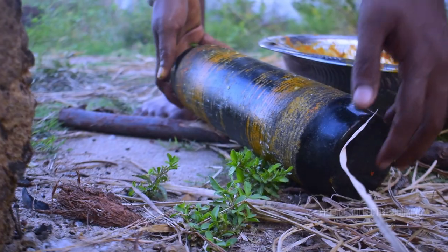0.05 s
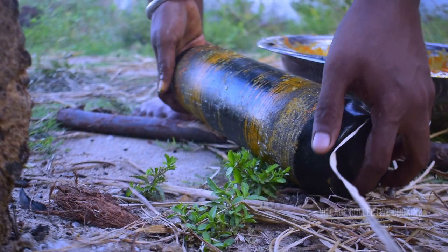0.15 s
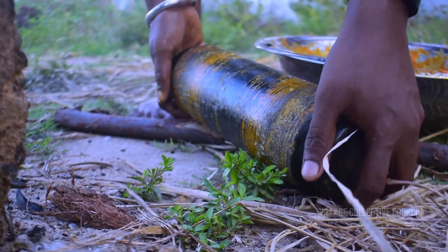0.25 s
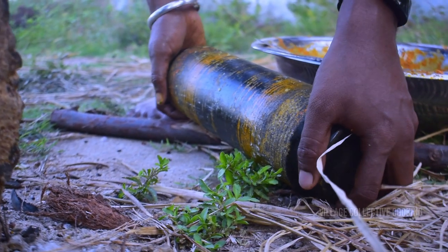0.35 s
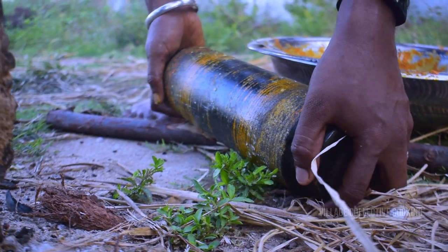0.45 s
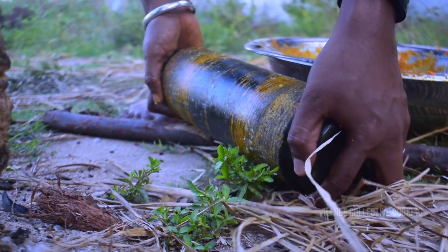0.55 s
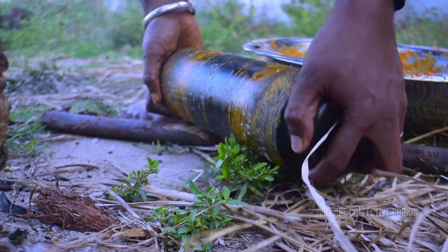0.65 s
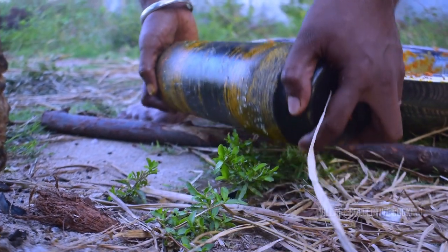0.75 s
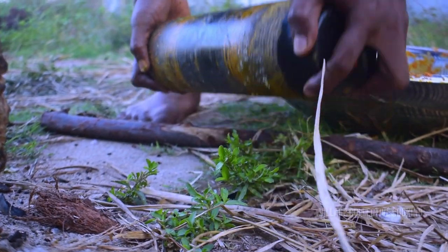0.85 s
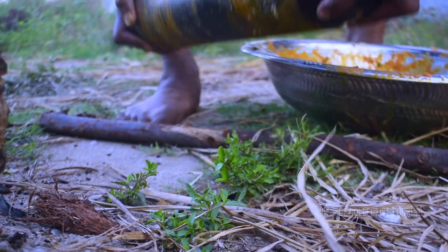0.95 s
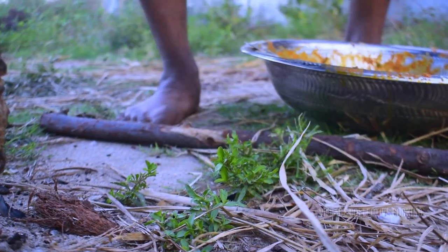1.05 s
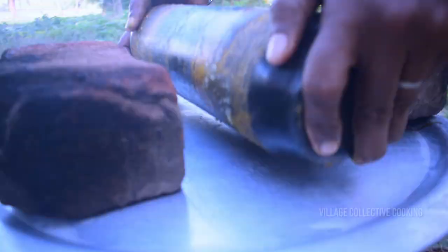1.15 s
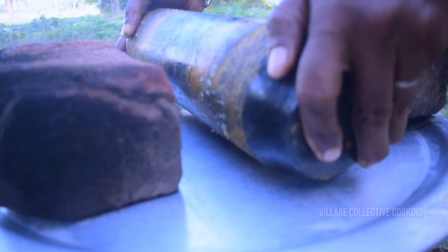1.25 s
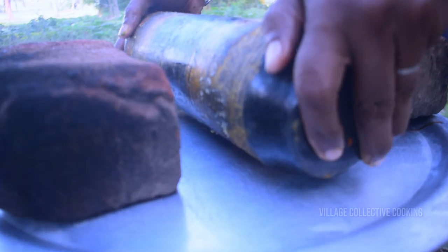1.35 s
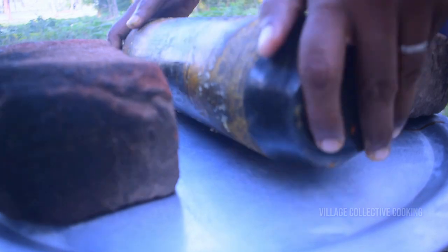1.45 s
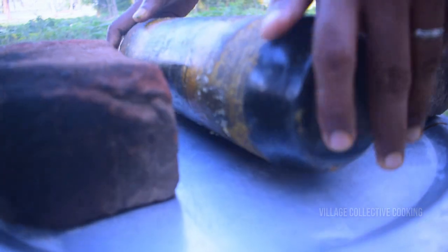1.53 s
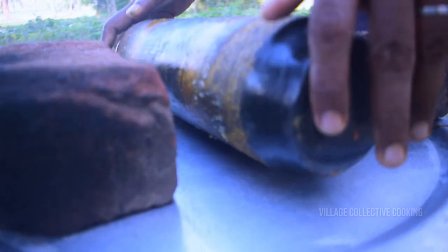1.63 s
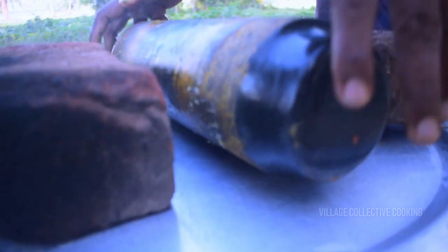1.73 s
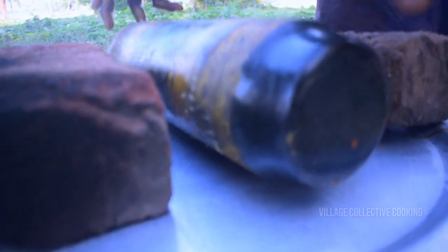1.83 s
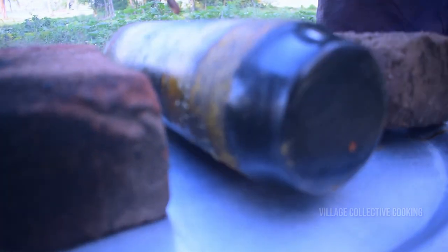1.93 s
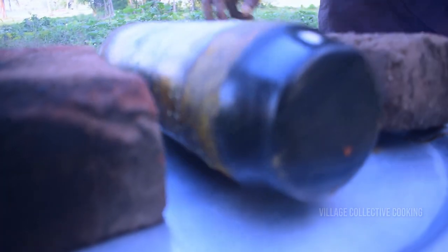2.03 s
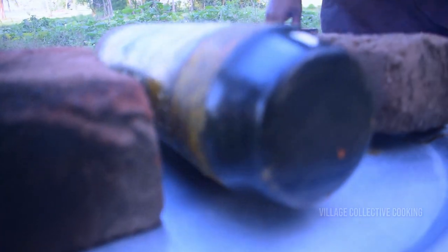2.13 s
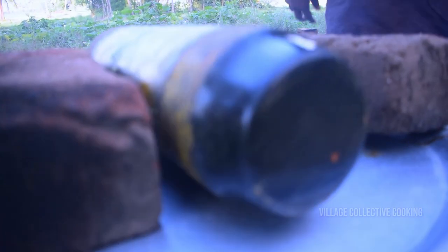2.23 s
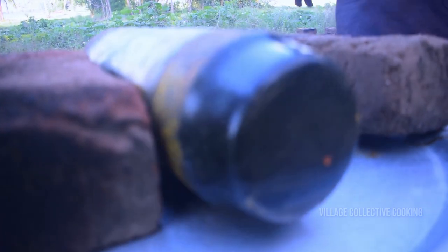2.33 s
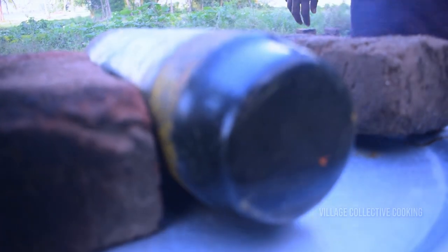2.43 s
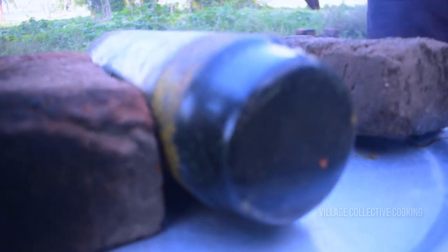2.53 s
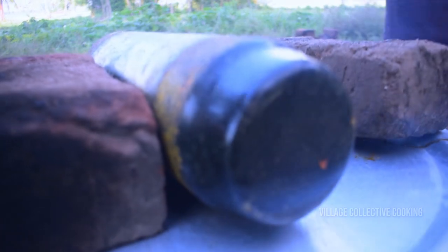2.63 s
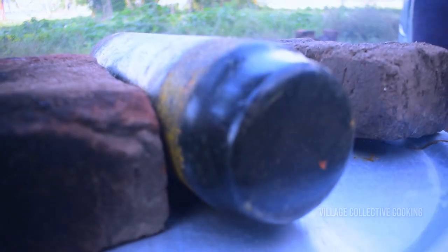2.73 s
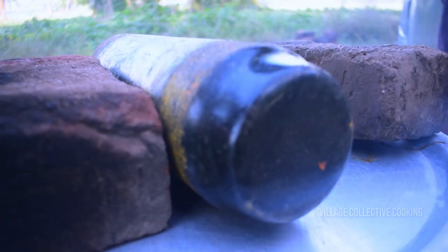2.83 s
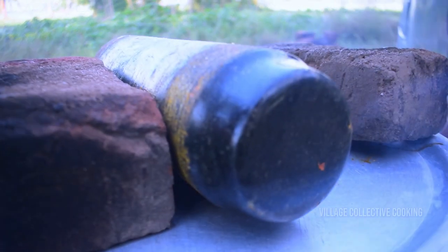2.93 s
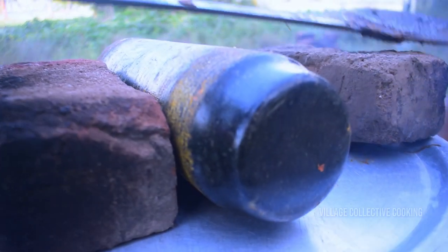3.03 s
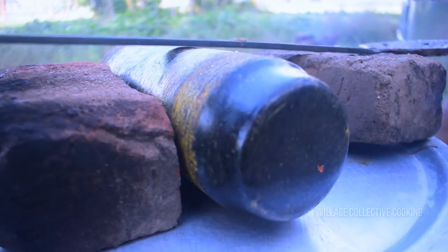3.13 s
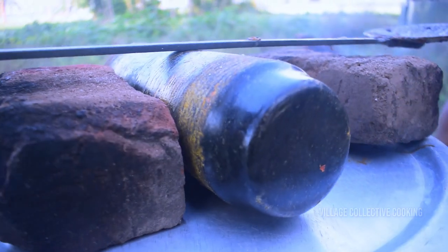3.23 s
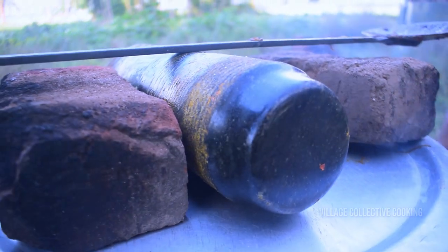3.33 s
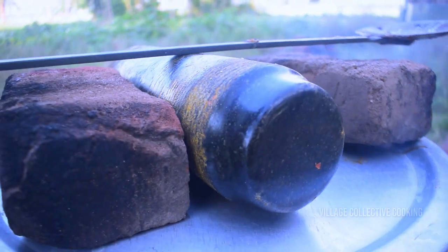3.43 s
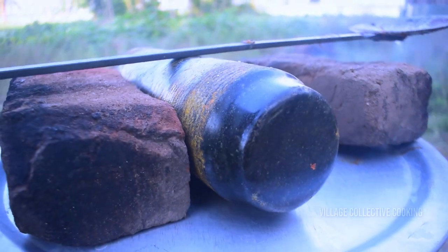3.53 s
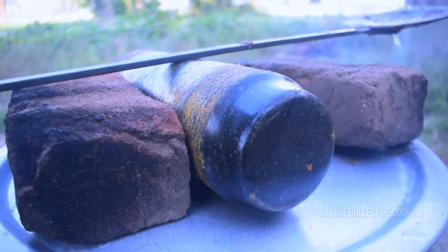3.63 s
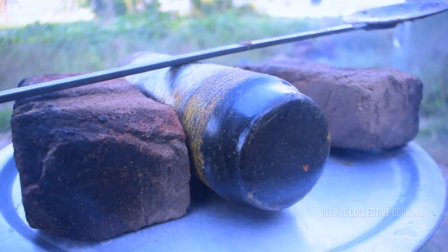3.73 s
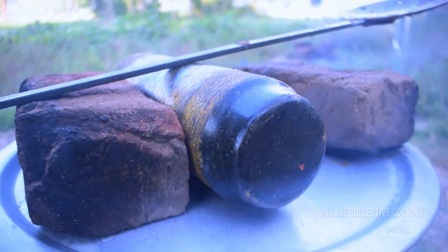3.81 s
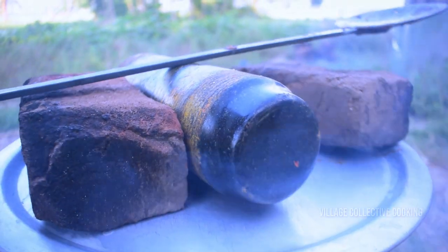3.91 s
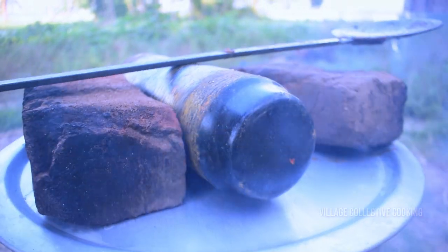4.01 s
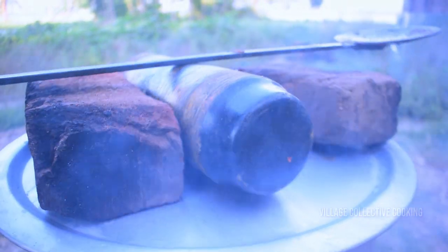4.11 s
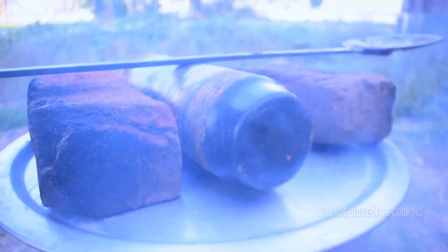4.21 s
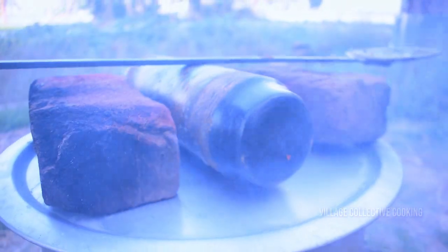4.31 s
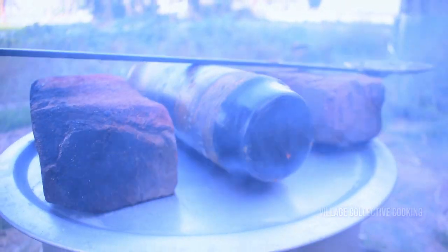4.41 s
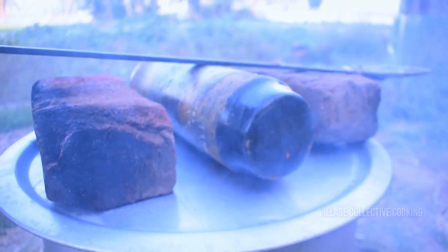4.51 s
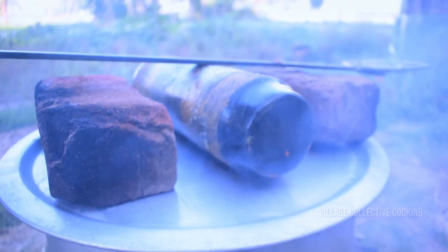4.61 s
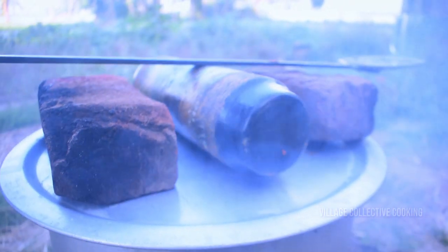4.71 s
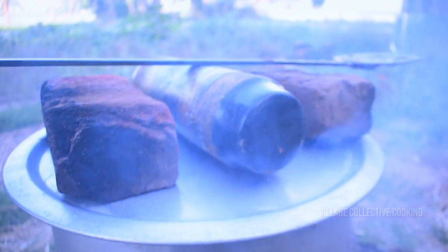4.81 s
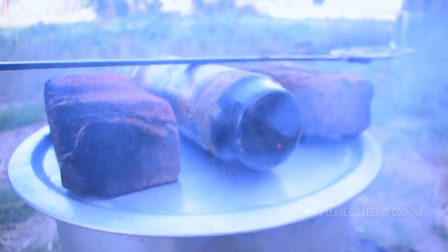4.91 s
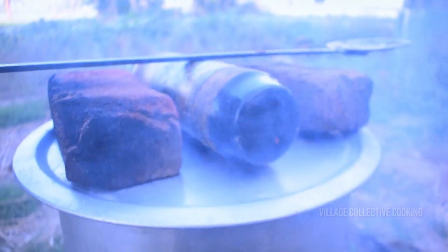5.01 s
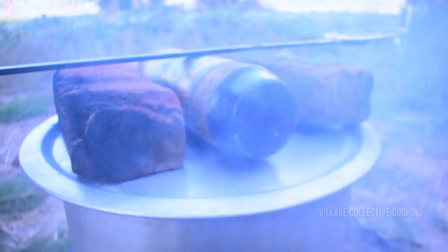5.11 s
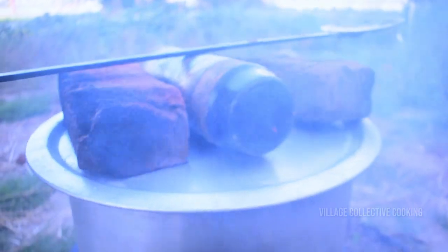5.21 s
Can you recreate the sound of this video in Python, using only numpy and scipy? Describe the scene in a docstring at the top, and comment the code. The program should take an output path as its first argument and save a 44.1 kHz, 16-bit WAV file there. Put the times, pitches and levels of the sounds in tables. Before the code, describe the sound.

Soft open-air hush with crisp rustling, then a short bird chirp just before a heavy clank on a metal pot lid. More knocks tumble and rock, fading to small ticks. Around the middle another cluster of hard blows includes a bright glass clink. A thin scrape and low lid hum follow, then a dull bump, fine rustles and distant chirps, all closely miked.

```python
"""Outdoors, over soft shaped-noise air, hands lift a heavy bottle out of dry straw: crackling grains, crushed grit.
A near bird calls in gliding partials; then bottle and bricks land and rock on a loaded metal lid, noise-driven modes.
More blows follow, with taps that ring the glass modes; a thin rod scrapes by stick-slip noise and the lid hums.
A faint far bird call sounds near the end, looped about every .2 s.
The loudest blows overload the microphone, a lopsided soft limit."""
import sys
import numpy as np
from scipy import signal
from scipy.fft import rfft, irfft
from scipy.io import wavfile
from scipy.ndimage import uniform_filter1d

SR = 44100
rng = np.random.default_rng(int(sys.argv[2]) if len(sys.argv) > 2 else 0)


def master(y):
    """Save y as 16-bit WAV."""
    cut = np.clip(np.atleast_2d(y).T, -1, 1)
    pcm = np.round(cut * 32767)  # scale
    wavfile.write(sys.argv[1], SR, pcm.astype(np.int16))


N = 231604


def undb(db):
    """Level to amplitude: 20 dB for each factor of ten."""
    return 10 ** (np.asarray(db) / 20)


def unit(x):
    """Normalisation to a root-mean-square value of one."""
    return x / np.sqrt(np.mean(x ** 2))


def track(rows):
    """Linear interpolation of a timed curve."""
    return np.interp(np.arange(N) / SR, *np.transpose(rows))


def colour(x, shape):
    """Minimum-phase filtering by the folded cepstrum: a causal (f/Hz, level/dB) shape, unit gain on noise."""
    hz, db = np.transpose(shape)
    bins_hz = np.arange(2049) * SR / 4096
    log_gain = np.interp(np.log(bins_hz + 1), np.log(hz), db) * np.log(10) / 20
    cepstrum = irfft(log_gain)
    cepstrum[1:2048] *= 2
    cepstrum[2049:] = 0
    impulse = irfft(np.exp(rfft(cepstrum)))[:2048]
    return signal.fftconvolve(x, impulse / np.linalg.norm(impulse))[:N]


def ring(x, modes):
    """Modal superposition: the drive excites a sum of decaying sines, unit gain on noise."""
    t = np.arange(SR // 2) / SR
    impulse = np.zeros(len(t))
    for hz, db, t60 in modes:
        decay = undb(db - 60 * t / np.clip(t60, .01, .6))
        impulse += rng.choice([-1, 1]) * decay * np.sin(2 * np.pi * hz * t)
    return signal.fftconvolve(x, impulse / np.linalg.norm(impulse))[:N]


def bursts(s, db, t60, rise, hz=None):
    """Exponential decay after a short rise: envelopes of contacts, or sines when frequencies are given."""
    out = np.zeros(N + SR)
    for k, at in enumerate((np.asarray(s) * SR).astype(int)):
        last = np.clip(t60[k], .004, .7)
        t = np.arange(int(1.4 * last * SR)) / SR
        shape = undb(db[k] - 60 * t / last) * np.minimum(t / rise, 1)
        if hz is not None:
            shape = shape * np.sin(2 * np.pi * hz[k] * t)
        out[at:at + len(t)] += shape
    return out[:N]


# how fast each kind of gesture dies once its hold ends [dB/s]
FADE_DB_S = dict(drag=900, rustle=420, rock=100, note=3500)


def swells(s, rise, hold, db, fade_db_s):
    """Power addition of gestures, each rising from 20 dB down, holding and fading linearly in dB."""
    t = np.arange(0, N, 32) / SR
    u = t - np.asarray(s)[:, None]
    rise, hold, db = (np.asarray(v)[:, None] for v in (rise, hold, db))
    climb = 20 * np.maximum(1 - u / np.maximum(rise, 1e-4), 0)
    fade = fade_db_s * np.maximum(u - rise - hold, 0)
    power = np.sum(undb(2 * (db - climb - fade)) * (u > 0), axis=0)
    return np.interp(np.arange(N) / SR, t, np.sqrt(power))


def walk(rate):
    """Slewed random modulation: normal values held 1 / rate s, then smoothed; spread near 1."""
    k = int(SR / rate)
    return uniform_filter1d(np.repeat(rng.standard_normal(N // k + 1), k), k)[:N]


def grains(rate, spread_db, hiss):
    """Shot noise: sparse clicks of very uneven size, mean count rate per second, over an even hiss."""
    size = undb(spread_db * np.minimum(rng.exponential(size=N), 3))
    clicks = (rng.random(N) < rate / SR) * rng.standard_normal(N) * size
    return unit(unit(clicks) + hiss * rng.standard_normal(N))


# spectrum of the open air: f/Hz, relative level/dB
AIR_SPECTRUM = [(15, -65), (25, -31.5), (146, -0.5), (288, 2), (378, 2), (470, -3), (1730, -10.5),
                (2270, -14.5), (5420, -16), (8600, -17.5), (10700, -19.5), (15200, -28.5), (16500, -53)]
# low band of the air before its random swell, louder until about 1.2 s: t/s, level/dB
AIR_LEVEL = [(0., -57.5), (1.19, -54.5), (1.21, -64.5), (3.2, -65), (4.3, -63), (5.25, -65)]


def air():
    """Stationary noise with slow amplitude modulation: a soft outdoor hush whose bass swells slowly."""
    white = rng.standard_normal((2, N))
    low_shape = [row for row in AIR_SPECTRUM if row[0] < 2500] + [(3000, -79)]
    high_shape = [(1000, -38)] + [row for row in AIR_SPECTRUM if row[0] > 1500]
    low = undb(track(AIR_LEVEL) + 2.0 * walk(5.4)) * colour(white[0], low_shape)
    high = undb(-66.5 + 3.3 * walk(16)) * colour(white[1], high_shape)
    return low + high


# rustling of straw, hands and grit, with a faint steady hiss beneath from 1.21 s:
# start t/s, rise/s, hold/s, middle band level/dB, thin top band level/dB
RUSTLES = [(.0, .025, 1.11, -56, -57), (.19, .06, .02, -50, -44), (.4, .05, .24, -48, -44),
           (.47, .06, .04, -45, -47), (1.21, .02, 4.1, -68, -78), (1.44, .03, .15, -58, -72),
           (1.66, .05, .03, -59, -60), (1.8, .1, .1, -55, -52), (2.04, .08, .03, -60, -69),
           (2.17, .05, .2, -63, -62), (2.55, .15, .04, -59, -59), (2.85, .15, .05, -60, -57),
           (3.18, .03, .08, -58, -64), (3.38, .08, .1, -61, -57), (3.84, .07, .06, -63, -61),
           (4.0, .03, .1, -65, -72), (4.11, .06, .08, -57, -60), (4.27, .01, .13, -56, -52),
           (4.45, .01, .07, -52, -60), (4.65, .01, .2, -66, -70), (4.87, .03, .27, -60, -60),
           (5.17, .02, .1, -63, -80)]


def rustle():
    """Frictional shot noise: stalks and fingers crackle in a middle and a thin top band, over a faint hiss."""
    s, rise, hold, mid_db, top_db = np.transpose(RUSTLES)

    def move(db):
        """Amplitude modulation: swells with random unevenness."""
        return swells(s, rise, hold, db, FADE_DB_S["rustle"]) * undb(1.8 * walk(40))

    mid_shape = [(500, -33), (1500, -16), (3500, 2), (5500, 5.0), (7500, -1.5), (10000, -47)]
    top_shape = [(6000, -4), (8500, -7), (10500, -1.), (13000, -3.0), (16000, -12)]
    mid = colour(grains(700, 2.6, 1.9), mid_shape)
    top = colour(grains(700, 4.6, 1.6), top_shape)
    return move(mid_db) * mid + move(top_db) * top


# grit crushed at a contact: t/s, relative level/dB, brightness/dB
CRACK_EVENTS = [(.175, -42, -3), (.245, -42, 5), (.3784, -49, 9), (.427, -43, 8), (.4683, -39, 3),
                (.4857, -46, 6), (1.2195, -15, -3), (1.2356, -31, -12), (1.2728, -35, -11),
                (1.4175, -14, 0), (1.4298, -18, -4), (1.44, -16, -1), (1.4554, -31, 4), (1.4674, -36, 7),
                (1.51, -43, 2), (1.5694, -46, -12), (1.6232, -46, -11), (1.6818, -43, -10),
                (1.7447, -49, 0), (1.8108, -50, 4), (1.8494, -41, 4), (1.8635, -42, 3), (1.8811, -47, 2),
                (1.8984, -35, 3), (1.9059, -26, 1), (1.952, -41, 4), (1.9764, -44, 8), (1.9925, -38, 8),
                (2.0006, -35, 7), (2.0777, -55, 7), (2.1311, -51, 2), (2.198, -50, 4), (2.2404, -46, 2),
                (2.2605, -43, 5), (2.29, -46, 6), (2.31, -38, 3), (2.342, -31, -1), (2.3907, -40, 5),
                (2.537, -54, -9), (2.7142, -47, -2), (2.8173, -53, -9), (2.9944, -47, -1),
                (3.0215, -48, -4), (3.0741, -16, -2), (3.0855, -18, -9), (3.1094, -41, -9),
                (3.1234, -23, -7), (3.1587, -21, -5), (3.253, -48, -3), (3.3654, -52, -3), (3.4798, -46, 0),
                (3.5124, -48, -2), (4.18, -50, 8), (4.2845, -38, 6), (4.2942, -40, 2), (4.316, -45, 4),
                (4.3344, -46, 4), (4.3455, -45, 0), (4.3683, -45, 3), (4.41, -44, 1), (4.4613, -30, -2),
                (4.5605, -45, 3), (4.6069, -44, 2), (4.6573, -36, 7), (4.93, -51, 6), (4.9592, -48, 2),
                (5.01, -50, 6), (5.036, -52, 6), (5.0643, -48, 2), (5.1161, -35, 4), (5.1593, -38, 6)]
# broad spectrum of crushed grit: f/Hz, relative level/dB
GRIT_SPECTRUM = [(2500, -29.5), (3500, -1), (4200, -0.5), (5800, 4.5), (7000, -4), (8500, -5.5),
                 (11000, -28.5)]
# hard edges that chime: f/Hz, relative level/dB, t60/s
SHARD_MODES = [(3840, -3, 0.047), (4200, -0.5, 0.023), (4770, -3.5, 0.021), (5190, 1, 0.026),
               (5410, -9, .03), (5580, 1, 0.022), (6410, -1, 0.018), (7360, -10, 0.017)]
CRACK_T60_S, CRACK_T60_S_PER_DB = .062, .0006  # at -20 dB; harder contacts spit longer


def contacts():
    """Brittle fracture: noise spits unevenly as it dies; bright contacts trade lows for top, hard edges chime."""
    s, db, bright_db = np.transpose(CRACK_EVENTS)
    t60 = CRACK_T60_S + CRACK_T60_S_PER_DB * (db + 20)
    spit = grains(4000, 2.2, 1.2) * undb(2.2 * walk(250))
    crush = bursts(s, db, t60, rise=0.0007) * spit
    low_push = bursts(s, db - bright_db, 1.16 * t60, rise=.0006) * spit
    top_push = bursts(s, db + bright_db, 0.71 * t60, rise=0.0011) * spit
    low = colour(low_push, [(700, -23), (1500, 1.5), (3000, 1.5), (4500, -30.5)])
    top = colour(top_push, [(5000, -28), (8000, 5.0), (12000, -1.5), (16000, -12)])
    middle = colour(crush, GRIT_SPECTRUM)
    chime = ring(crush, SHARD_MODES)
    return middle + undb(-5.0) * chime + undb(-7.5) * low + undb(-2.5) * top


# throat resonance: f/Hz, gain/dB
THROAT_GAIN = [(1000, -22), (2200, -18), (3300, -4), (4150, -8), (4420, 1), (5000, -6), (5450, 0),
               (6500, -24), (8000, -28), (10500, -42), (13000, -72), (17000, -110)]


def song(notes, dull_db_khz):
    """Source-filter voice: each slightly hoarse note bends along an arc, the throat weighs five partials."""
    out = np.zeros(N)
    throat_hz, throat_db = np.transpose(THROAT_GAIN)
    wobble = 1 + .012 * walk(500)
    flutter = [walk(200) for _ in range(5)]
    for s, length, hz0, hz1, hz2, db, lift_db in notes:
        at = np.arange(int((s - .003) * SR), int((s + length + .02) * SR))
        u = np.clip((at / SR - s) / length, -.1, 1.1)
        bend = (hz1 - (hz0 + hz2) / 2) * 4 * u * (1 - u)
        hz = hz0 + (hz2 - hz0) * u + bend
        phase = 2 * np.pi * np.cumsum(hz * wobble[at]) / SR
        edge = np.sqrt(2) * swells([s - .002], [.004], [length - .004], [db], FADE_DB_S["note"])[at]
        for k in range(1, 6):
            throat = np.interp(np.log(k * hz), np.log(throat_hz), throat_db)
            tilt = lift_db * (k - 1) + dull_db_khz * k * hz / 1000
            out[at] += edge * undb(throat + tilt + k * flutter[k - 1][at]) * np.sin(k * phase)
    return out


# near call: start t/s, length/s, start f/Hz, middle f/Hz, end f/Hz, level before the throat/dB,
# lift of each overtone/dB
NEAR_NOTES = [(.841, .021, 1050, 1760, 2430, -26, 0), (.864, .033, 3090, 3330, 2980, -26, 13),
              (.901, .063, 2280, 1990, 1650, -21, 0)]
# far call, same columns: start t/s, length/s, start, middle and end f/Hz, level/dB, overtone lift/dB
FAR_NOTES = [(4.876, .027, 3400, 3180, 2760, -38, 0), (4.907, .04, 2060, 1900, 1700, -35, 3)]
# looped copies of the far call: shift t/s, relative level/dB
FAR_LOOP = [(-.396, -3.5), (-.203, -1), (0., 0), (.197, 0), (.287, -13.5)]
FAR_DULL_DB_KHZ = -4.5  # treble tilt of the far call


def birds():
    """Diffuse reflection: near call with hoarse start and looped far call, blurred by echo off moving leaves."""
    hoarse = bursts([.832, .845], [-33., -32.], [.12, .06], rise=0.0025) * rng.standard_normal(N)
    hoarse_shape = [(900, -30), (2000, -12.5), (5500, -11.0), (7000, -11.5), (10000, -19.5), (12000, -40)]
    calls = song(NEAR_NOTES, 0) + colour(hoarse, hoarse_shape)
    far = song(FAR_NOTES, FAR_DULL_DB_KHZ)
    for shift, db in FAR_LOOP:
        calls = calls + undb(db) * np.roll(far, int(shift * SR))
    t = np.arange(SR // 2) / SR
    trees = rng.standard_normal(len(t)) * undb(-60 * t / 0.55) * np.minimum(t / .006, 1)
    moving = calls * (.5 + walk(700))
    echo = signal.fftconvolve(moving, trees / np.linalg.norm(trees))[:N]
    return calls + undb(-14.0) * echo


def lid(push, modes, broad):
    """Damped plate vibration: the weighed-down sheet gives short modes over a broad band."""
    return undb(-2.5) * ring(push, modes) + undb(-6.0) * colour(push, broad)


# where a load lands decides which lid mode sings: f/Hz, level over the boom/dB
CENTRE, HALF, NEAR_RIM, RIM = (255, 1.5), (415, 0), (640, -8), (1010, -0.5)
# blows on the lid: t/s, relative boom level/dB, relative knock level/dB, place (f/Hz, level over the boom/dB)
LID_BLOWS = [(1.221, -13, -10, CENTRE), (1.238, -14, -15, RIM), (1.271, -19, -26, NEAR_RIM),
             (1.284, -22, -33, HALF), (1.325, -23, -35, HALF), (1.39, -33, -50, CENTRE),
             (1.417, -29, -12, RIM), (1.43, -18, -19, RIM), (1.445, -26, -21, HALF),
             (1.466, -28, -39, CENTRE), (1.489, -28, -35, CENTRE), (1.51, -33, -40, CENTRE),
             (1.567, -24, -25, HALF), (1.589, -28, -44, NEAR_RIM), (1.623, -27, -28, HALF),
             (1.644, -30, -43, NEAR_RIM), (1.68, -25, -26, HALF), (1.708, -30, -52, CENTRE),
             (1.743, -28, -36, HALF), (1.789, -42, -54, HALF), (1.844, -50, -42, HALF),
             (1.901, -43, -34, RIM), (1.994, -54, -47, RIM), (2.289, -58, -46, RIM),
             (2.341, -29, -34, CENTRE), (2.391, -45, -46, RIM), (2.531, -52, -49, RIM),
             (2.732, -56, -51, HALF), (2.812, -53, -49, RIM), (3.012, -59, -51, HALF),
             (3.074, -15, -18, CENTRE), (3.087, -19, -15, NEAR_RIM), (3.104, -24, -24, HALF),
             (3.123, -19, -17, NEAR_RIM), (3.139, -23, -35, HALF), (3.158, -30, -27, NEAR_RIM),
             (3.194, -26, -30, CENTRE), (3.254, -36, -40, NEAR_RIM), (3.288, -42, -55, CENTRE),
             (3.364, -41, -50, CENTRE), (3.423, -40, -50, NEAR_RIM), (3.48, -32, -48, CENTRE),
             (3.511, -38, -53, CENTRE), (4.295, -60, -49, HALF), (4.368, -56, -45, HALF),
             (4.407, -53, -50, HALF), (4.46, -28, -35, CENTRE), (4.476, -25, -37, NEAR_RIM),
             (4.504, -28, -38, NEAR_RIM), (4.523, -27, -43, CENTRE), (4.56, -38, -44, CENTRE),
             (4.607, -52, -55, HALF), (4.657, -50, -48, CENTRE), (4.759, -58, -72, CENTRE),
             (5.117, -56, -47, RIM), (5.159, -66, -51, RIM)]
# loads rocking on the lid: start t/s, rise/s, hold/s, relative level/dB
ROCKING = [(1.3, .07, .22, -43), (3.22, .08, .09, -47), (3.85, .15, .1, -68), (4.5, .05, .22, -61)]
# deep modes of lid and pot air: f/Hz, relative level/dB, t60/s
BOOM_MODES = [(122, -14, 0.11), (161.4, -10.5, 0.14), (201.4, -4, 0.15), (255.6, -2, 0.14),
              (307.7, -1, 0.1), (353, -1, .11), (415.5, -1, .11), (470.4, -2.5, 0.075), (521.5, -3.5, .1),
              (575, -7.5, .08)]
# hard modes of the sheet: f/Hz, relative level/dB, t60/s
KNOCK_MODES = [(636, -6.5, 0.067), (742, 0, 0.069), (828, -2, 0.074), (892, -4, 0.083), (998, -1, .07),
               (1066, -3, .08), (1160, -4.5, 0.078), (1318, -3, 0.042), (1392, -9.5, .05), (1517, -4, .045),
               (1664, -10.5, 0.025), (1876, -11.5, .035), (2155, -15, .035)]
BOOM_T60_S, SING_T60_S = .08, .115
KNOCK_T60_S, KNOCK_T60_S_PER_DB = .082, .0015  # at -20 dB; harder blows push longer


def thuds():
    """Modal excitation by impact: blows push deep and hard lid modes; where the load sits picks one ring."""
    s, boom_db, knock_db, hz, sing_db = np.transpose([row[:-1] + row[-1] for row in LID_BLOWS])
    knock_t60 = KNOCK_T60_S + KNOCK_T60_S_PER_DB * (knock_db + 20)
    rock = swells(*np.transpose(ROCKING), FADE_DB_S["rock"]) * undb(2.1 * walk(30))
    boom = bursts(s, boom_db, np.full(len(s), BOOM_T60_S), rise=0.0032) + rock
    knock = bursts(s, knock_db, knock_t60, rise=0.0014) + undb(-18.0) * rock
    rings = bursts(s, boom_db + sing_db, np.full(len(s), SING_T60_S), rise=0.0014, hz=hz)
    deep_shape = [(25, -70), (60, -40), (100, -13), (170, 1.5), (300, 3.0), (600, 3), (1200, -37.5)]
    hard_shape = [(250, -25.5), (600, -3.), (1000, 0.), (1700, 1.5), (3000, -39)]
    deep = lid(boom * rng.standard_normal(N), BOOM_MODES, deep_shape)
    hard = lid(knock * rng.standard_normal(N), KNOCK_MODES, hard_shape)
    return rings + deep + hard


# blows on the bottle: t/s, impulse level/dB, contact time/s
GLASS_TAPS = [(3.159, 14, 0.000065), (3.197, 10, 0.0003)]
# modes of the free glass: f/Hz, relative level/dB, t60/s
GLASS_MODES = [(1669, -20, .15), (2116, -20, .4), (2514, -10, .07), (2869, -9, .1), (3160, -9, .14),
               (3553, -13, .098), (3914, -9, .11), (4247, -1, .11), (4420, -15, .13), (4608, -3, .055),
               (4888, -20, .15), (5389, -14, .13), (6492, -1, .075), (8436, -21, .11)]
# rod dragged over the glass: start t/s, rise/s, hold/s, relative level/dB
ROD_DRAGS = [(3.84, .06, .07, -55), (4.04, .09, .16, -53)]
ROD_DAMPING = .6  # share of the free ring time left under the rod


def bottle():
    """Contact time limits bandwidth: a softer tap rings low modes; stick-slip noise drives glass and lid."""
    t = np.arange(N) / SR
    tap = np.zeros(N)
    for s, db, touch in GLASS_TAPS:
        push = np.sin(np.pi * np.clip((t - s) / touch, 0, 1))
        tap += undb(db) * push / (touch * SR)
    drag = swells(*np.transpose(ROD_DRAGS), FADE_DB_S["drag"])
    slip = drag * undb(2.23 * walk(60)) * grains(1200, 2.7, 1.3)
    damped_modes = [(hz, db, ROD_DAMPING * t60) for hz, db, t60 in GLASS_MODES]
    return ring(tap, GLASS_MODES) + ring(slip, damped_modes) + undb(-7.0) * ring(slip, KNOCK_MODES)


# faint low tones of the lid: t/s, f/Hz, level before wavering/dB, t60/s
LID_HUMS = [(3.94, 325, -50, .45), (3.94, 415, -50, .45), (4.08, 188.7, -49, .6), (4.28, 415, -48, .4),
            (4.62, 243, -49, .6)]


def hum():
    """Amplitude-modulated resonance: single lid modes that swell, waver and decay."""
    s, hz, db, t60 = np.transpose(LID_HUMS)
    return bursts(s, db, t60, rise=0.08, hz=hz) * undb(2 * walk(22))


def scene():
    """Linear superposition of all sources in one channel."""
    return (air() + rustle() + contacts() + birds() + thuds() + bottle() + hum())[None]


OVERLOAD = .25  # amplitude the limiter approaches
LOPSIDED = 0.16  # weight of the squared signal
TOP_HZ, CUT_HZ = 16000, 16900  # edges of the two low-pass filters


def record(dry):
    """Nonlinear distortion: the capsule drops deep bass, the input flattens peaks, one side more; top is cut."""
    x = signal.sosfilt(signal.butter(2, 40, "high", fs=SR, output="sos"), dry)
    x = x / (1 + np.abs(x / OVERLOAD) ** 5) ** .2
    x = x + LOPSIDED * x ** 2  # the uneven sides add a low thump
    x = signal.sosfilt(signal.butter(1, 25, "high", fs=SR, output="sos"), x)
    x = signal.sosfilt(signal.ellip(6, .3, 25, TOP_HZ, fs=SR, output="sos"), x)
    return signal.sosfilt(signal.ellip(8, .2, 70, CUT_HZ, fs=SR, output="sos"), x)


dry = scene()
out = record(dry)
master(out)
```